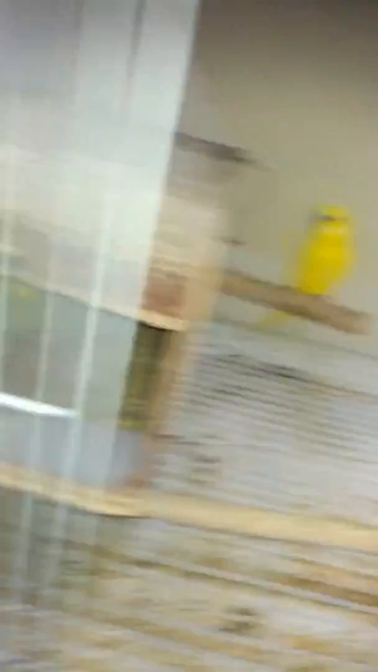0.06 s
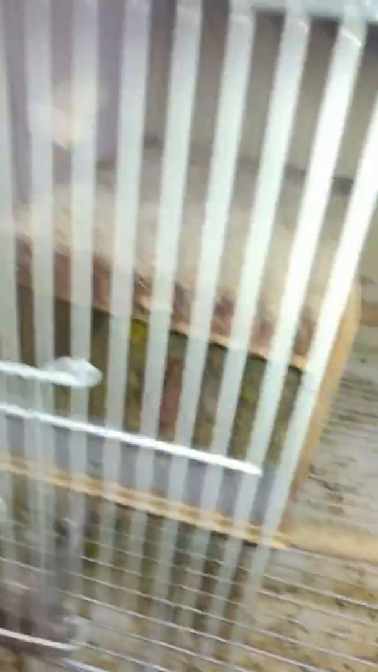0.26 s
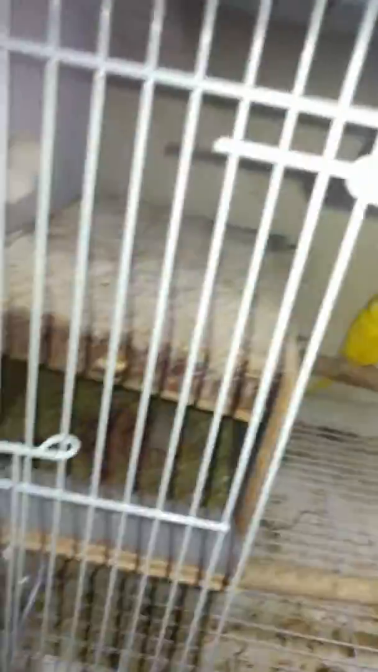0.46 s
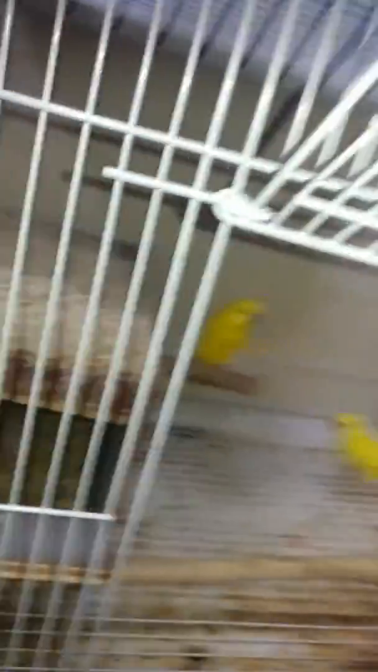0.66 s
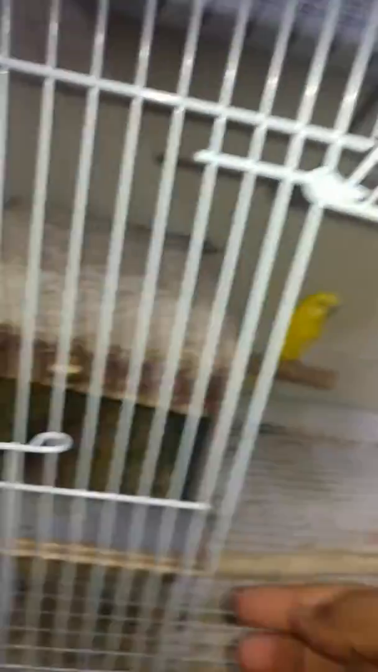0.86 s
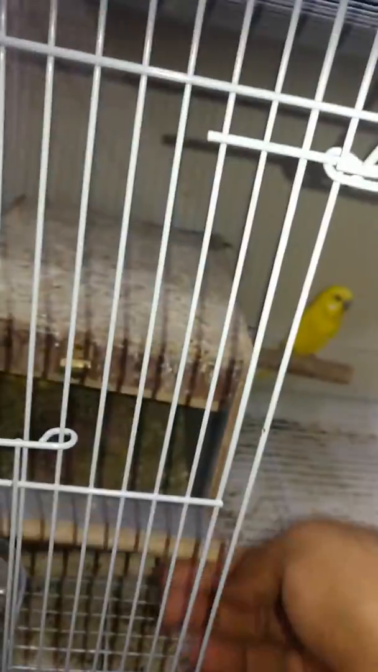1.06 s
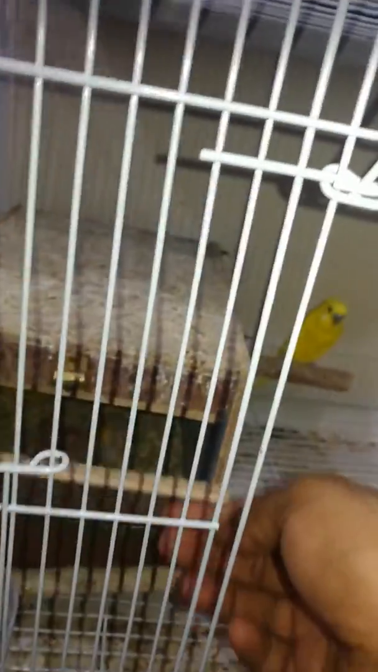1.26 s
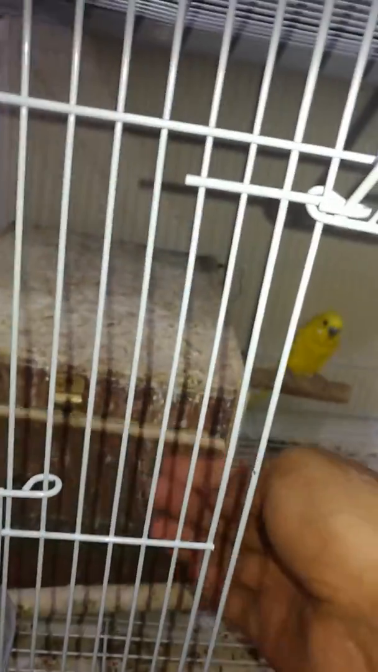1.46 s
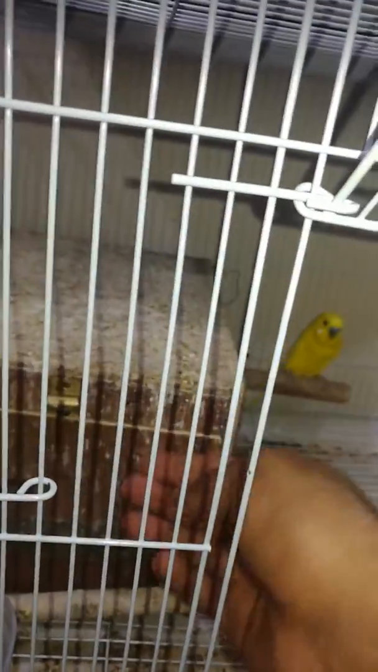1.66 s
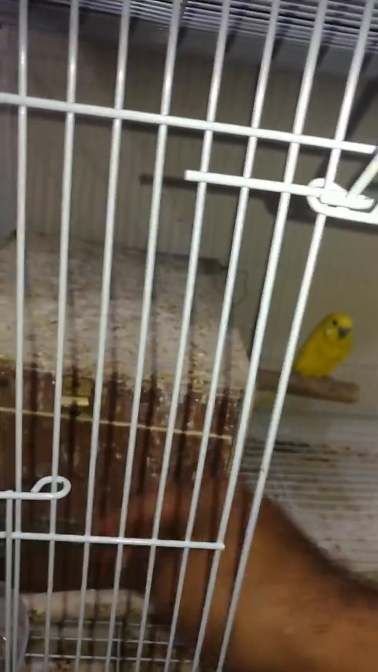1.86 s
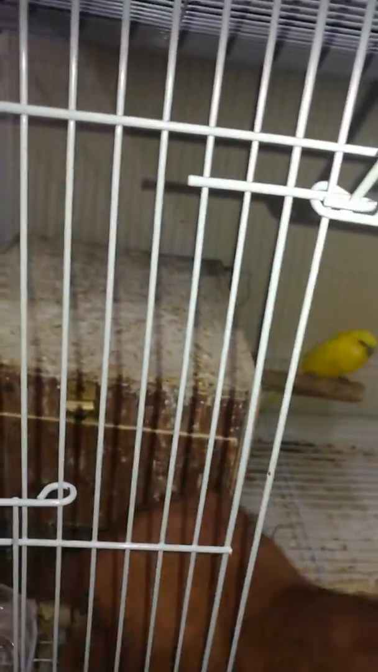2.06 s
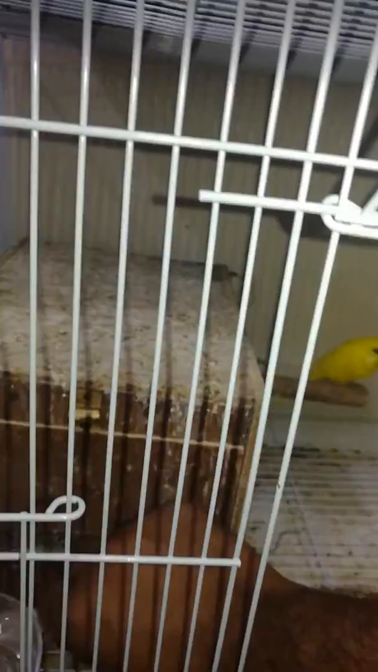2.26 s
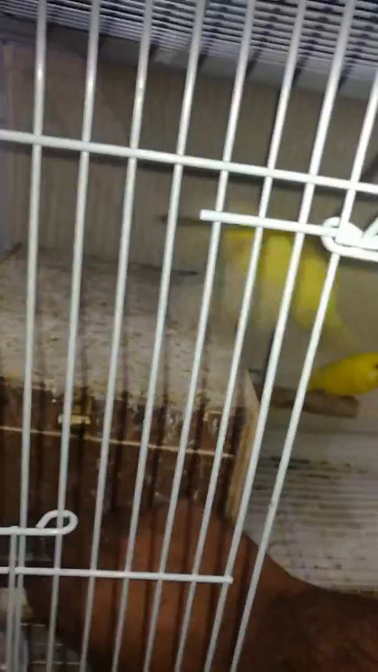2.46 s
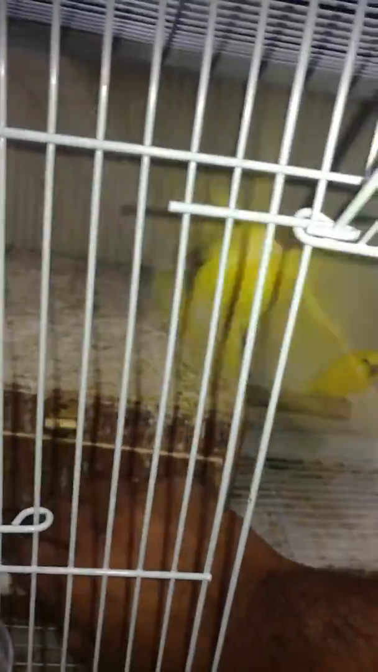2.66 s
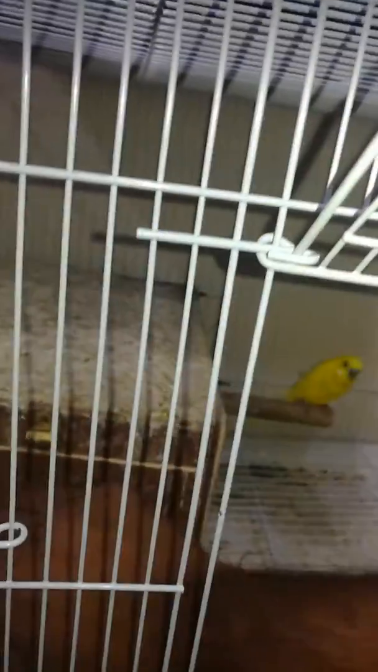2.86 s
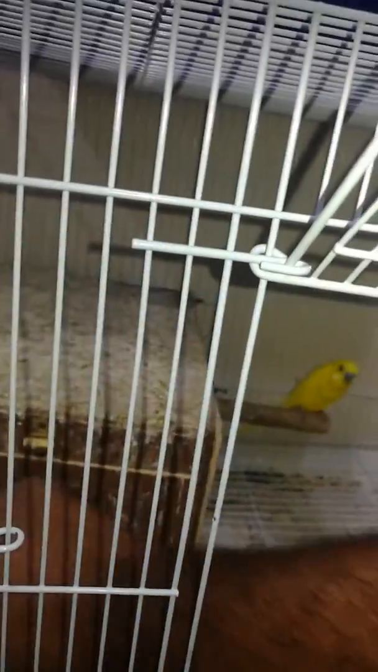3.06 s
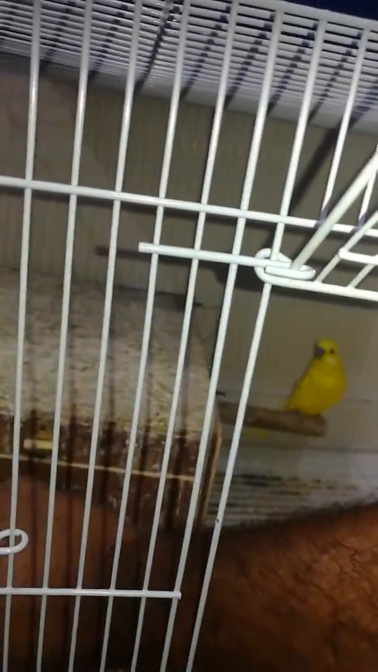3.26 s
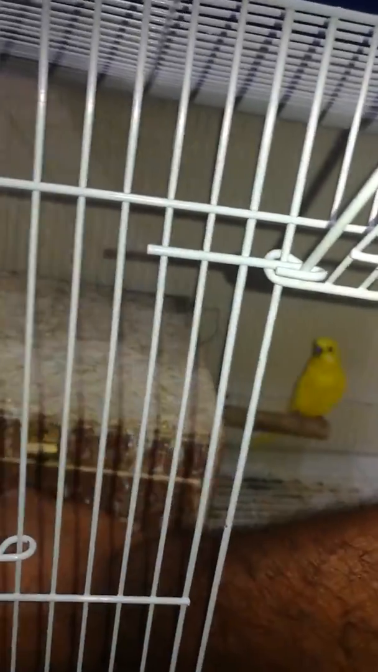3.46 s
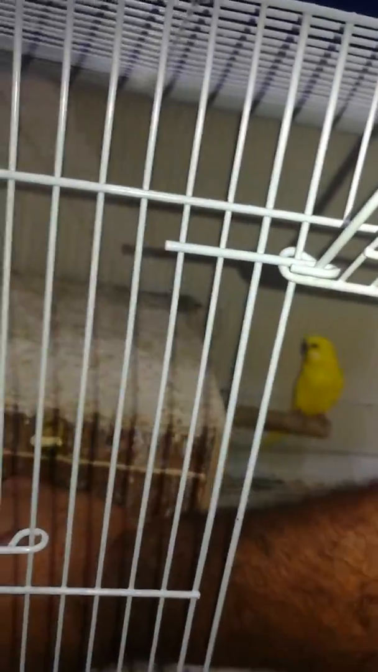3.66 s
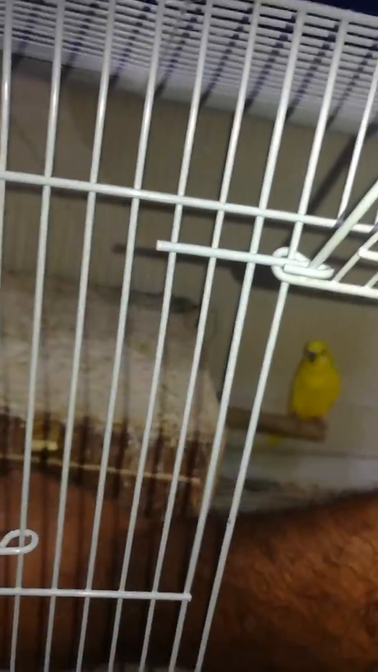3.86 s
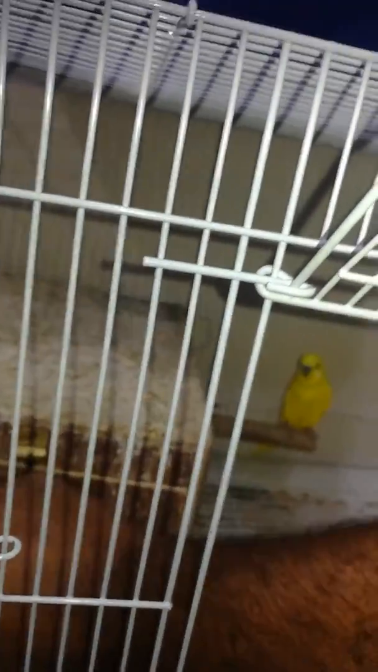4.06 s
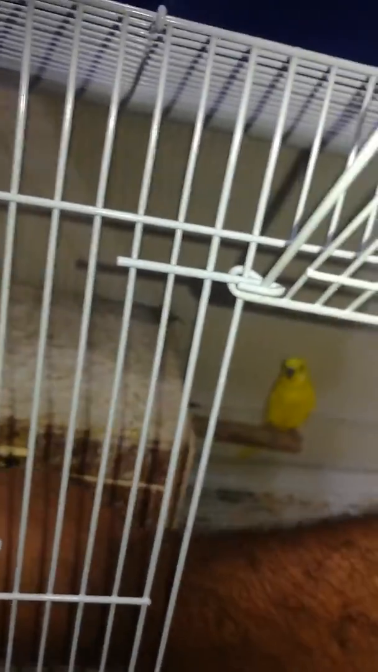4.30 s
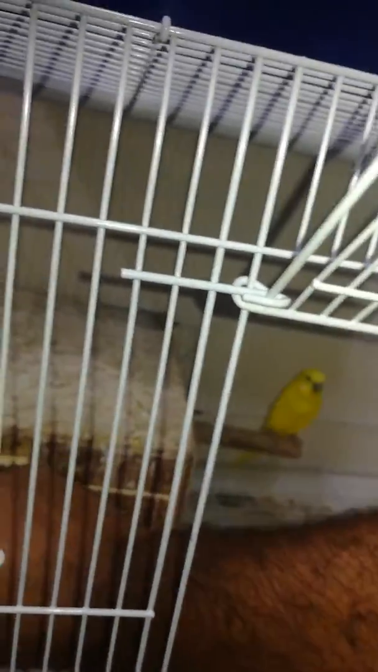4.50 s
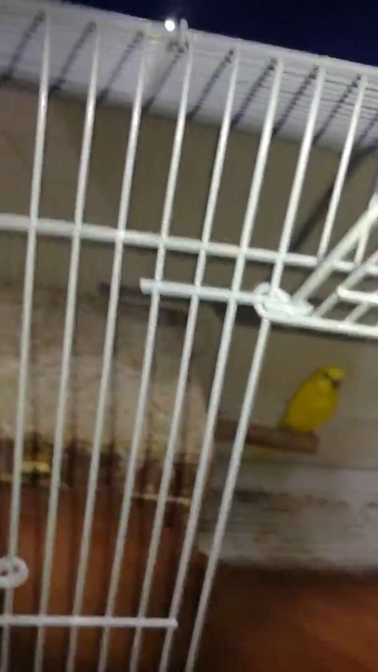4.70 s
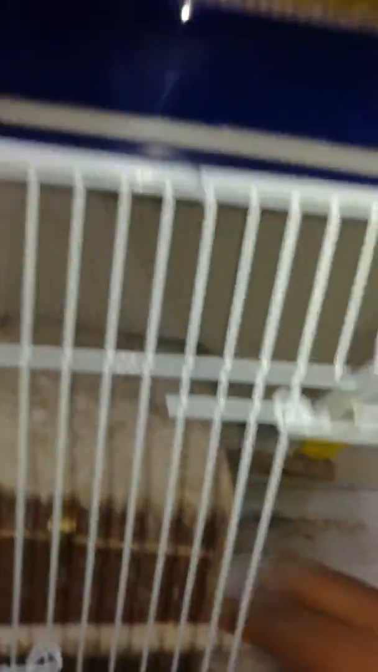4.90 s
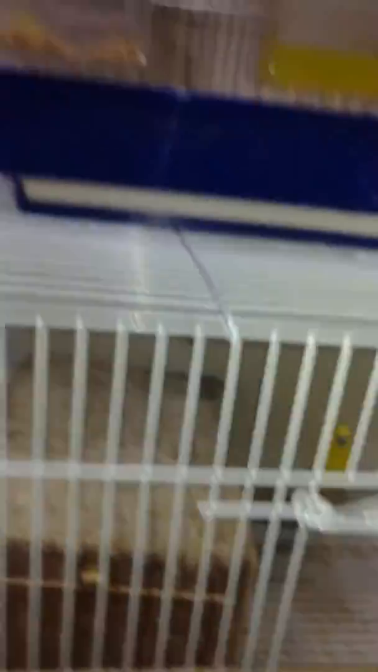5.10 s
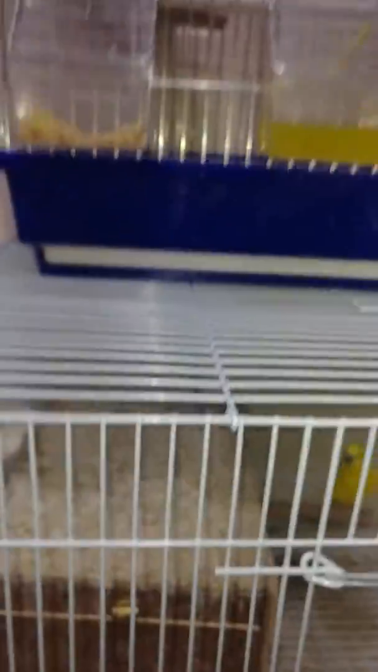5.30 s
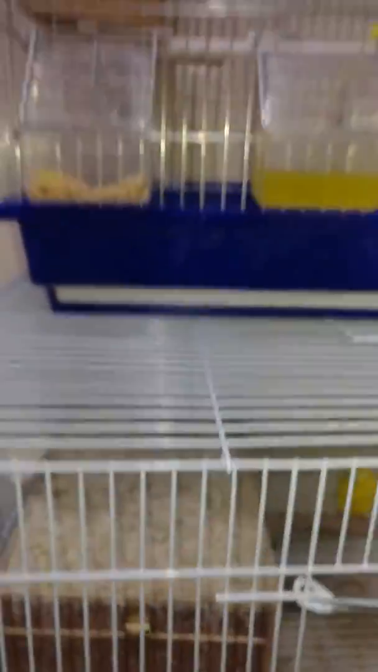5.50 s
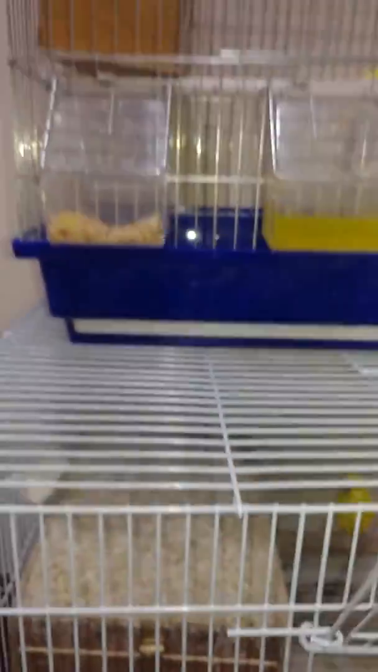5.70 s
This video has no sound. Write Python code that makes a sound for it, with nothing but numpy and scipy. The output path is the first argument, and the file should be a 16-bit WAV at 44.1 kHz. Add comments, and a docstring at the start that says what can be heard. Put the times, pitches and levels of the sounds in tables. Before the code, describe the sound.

Close indoor cage sounds: phone handling, short chirps, wooden bumps, a quick burst of fluttering against wires, then a distant slam.

```python
"""Small birds give short scratchy calls in a wire cage, indoors, close to a hand-held phone. The phone is handled,
a hand bumps and rummages in a wooden nest box, one bird flies up, wings slapping the bars; later something bangs
shut far off. Calls are warbling whistles with overtones; slaps, scrapes and rustles are grainy coloured noise;
bumps, wires and the bang's boom ring decaying modes; puffs are pressure pulses. A hard-walled room, a faint hum
and a noise floor surround them."""
import sys
import numpy as np
from scipy import signal
from scipy.fft import rfft, irfft
from scipy.io import wavfile

SR = 44100
rng = np.random.default_rng(int(sys.argv[2]) if len(sys.argv) > 2 else 0)


def master_out(mix):
    """Clip the mix to full scale and print it as 16-bit PCM to the path in sys.argv[1]."""
    frames = np.transpose(np.atleast_2d(mix))
    ceiling = np.clip(frames, -1, 1)
    pcm = np.round(ceiling * 32767).astype(np.int16)
    wavfile.write(sys.argv[1], SR, pcm)


N = 253134
T = np.arange(N) / SR  # s

# Phone. Each row: frequency in Hz, left minus right port level in dB.
PORT_SHADING = [(200, 0), (600, 1.5), (2200, -6), (4500, -6), (8000, 1), (15000, -2)]
PORT_LAG_SAMPLES, TOP_HZ = 25, 15900  # left port trails right; treble cutoff

# Room reverberation. Each row: frequency in Hz, T60 in seconds.
ROOM_T60 = [(150, 0.82), (500, 0.98), (1500, 0.78), (4000, 0.62), (8000, 0.3), (15000, 0.0059)]

# Noise floor spectrum. Each row: frequency in Hz, relative density in dB.
FLOOR_SPECTRUM = [(25, -13), (200, -17), (320, -14.5), (560, -23), (850, -18.5), (2000, -21.5), (8000, -35),
                  (16000, -38.5)]
FLOOR_DB = -68.5

# Faint low hum. Each row: time in seconds, level in dB.
HUM_LEVEL = [(2.8, -80), (3.55, -74), (3.8, -66), (5.1, -82)]
# Its two tones, in Hz.
HUM_HZ = (298.6, 344.6)

# Spectrum of the far bang's clatter. Each row: frequency in Hz, relative density in dB.
BANG_SPECTRUM = [(120, -65), (200, -36.5), (360, -34.5), (600, -39), (780, -30.5), (2170, -35),
                 (5840, -45.5), (16000, -67.5)]
# Boom and panel modes of the bang. Each row: frequency in Hz, relative level in dB, T60 in seconds.
BOOM_MODES = [(135.6, -8, 0.14), (161, 6, 0.034), (458.5, -19.5, 0.51), (2064, 5, 0.025)]
BANG_S, BANG_T60_S, BANG_TAIL_T60_S = 4.249, 0.4, 1.3
RATTLE_DB, BANG_TAIL_DB, BOOM_DB = -27.0, -39, -19.0

# Bumps: first the phone being handled, then the nest box. Each row: start in seconds, relative level in dB,
# contact time in seconds.
BUMPS = [(0.277, -51.5, 0.0014), (1.434, -44.5, 0.0015), (1.51, -45, 0.00023), (1.514, -26, 0.00082),
         (1.577, -39.5, 0.0017), (1.657, -40.5, 0.0054)]
# Nest box modes, rung by every bump. Each row: frequency in Hz, relative level in dB, T60 in seconds.
BOX_MODES = [(137.7, 2, 0.11), (182, 9.5, 0.045), (439, -9, 0.046), (813, 9, 0.046), (1193, 6, 0.02)]
BOX_LOW_HZ = 152

# Soft finger taps on the phone. Each row: start in seconds, relative level in dB.
TAPS = [(0.288, -54.5), (0.558, -60), (0.655, -57), (5.583, -71.5), (5.612, -67), (5.644, -65),
        (5.678, -63), (5.709, -61.5)]
# Finger dragging on the phone. Each row: time in seconds, relative level in dB.
DRAG_LEVEL = [(0.39, -79), (0.423, -46.5), (0.456, -51.5), (0.481, -43), (0.501, -41.5), (0.52, -70)]
# Drag spectrum. Each row: frequency in Hz, relative density in dB.
DRAG_SPECTRUM = [(330, -12.5), (480, 0.5), (900, 4.5), (1280, 0), (1600, -11.5), (3000, -20.5),
                 (7000, -41.5), (14000, -36.5)]
TAP_GAIN_DB, DRAG_GAIN_DB = 5.5, 10

# Spells of rustling: first the phone being handled, later hand, straw and feathers. Each row: start in seconds,
# length in seconds, relative rustle and air levels in dB.
RUSTLE_SPELLS = [(0, 0.27, -65.5, -62.5), (1.816, 0.22, -67, -49.5), (2.212, 0.17, -61.5, -45.5),
                 (2.562, 0.27, -65, -40.5), (2.929, 0.057, -63.5, -58.5)]
# Rustle spectrum. Each row: frequency in Hz, relative density in dB.
RUSTLE_SPECTRUM = [(150, -63), (250, -1), (651, -7), (816, 2.5), (1140, 0.5), (2440, -5), (2960, -11),
                   (16000, -26.5)]
# Buffeting air spectrum. Each row: frequency in Hz, relative density in dB.
AIR_SPECTRUM = [(12, -14), (20, -11.5), (50, 5), (128, -1), (360, -27), (700, -91)]
RUSTLE_ATTACK_S, RUSTLE_RELEASE_T60_S = 0.0019, 1

# Short scratchy contacts: claws, beaks and wing strokes on the wires. Each row: start in seconds, relative
# level in dB.
SCRATCHES = [(0.102, -53), (1.663, -58), (1.910, -47), (2.054, -56.5), (2.216, -46.5), (2.269, -48.5),
             (2.526, -49), (2.576, -43), (2.594, -40.5), (2.937, -49), (2.991, -51.5), (3.042, -35.5),
             (3.189, -53.5), (4.603, -47)]
# Cage wire modes. Each row: frequency in Hz, relative level in dB, T60 in seconds.
WIRE_MODES = [(302, -9, 1.6), (802, -3, .9), (838, -1, .95), (880, -3, .9)]
# Feather and scratch spectrum. Each row: frequency in Hz, relative density in dB.
FEATHER_SPECTRUM = [(150, -3), (250, 3), (480, -7), (800, 7), (1350, 0), (1820, -1.5), (16000, -22)]
SCRATCH_T60_S, SCRATCH_GRAIN_DB = 0.05, 5

# Wing strokes and lighter flicks. Each row: centre in seconds, relative slap level in dB, relative air push
# level in dB, brightness in dB per octave.
WINGBEATS = [(2.627, -51, -28, 2), (2.680, -35.5, -21.5, 1.5), (2.723, -32, -33.5, -2.5),
             (2.728, -30.5, -30, 3.5), (2.764, -40.5, -37, -0.5), (2.780, -29, -35.5, -0.2),
             (2.797, -58, -27, 1), (2.818, -44.5, -30.5, 8), (2.829, -33.5, -38, 0.6)]
SLAP_S, SWISH_S, SWISH_DB = 0.0011, 0.007, -16.5  # decay constants; swish relative to slap
WING_WIDTH_DB = 1.5
# Raking: time of the nearest pass, half-width, drop at that half-width.
PASS_S, PASS_WIDTH_S, PASS_DROP_DB = 2.762, 0.07, 2.4
RAKE_DB, RAKE_TILT_DB_PER_OCTAVE = -51, 1.2

# Far calls. Each row: start in seconds, length in seconds, start and end pitch in Hz, relative level in dB,
# first overtone in dB, roughness from 0 to 1.
FAR_CALLS = [(3.84, 0.19, 1433, 1346, -62.5, -13, 0.54), (5.418, 0.017, 1225, 1164, -49.5, -25, 0.2),
             (5.58, 0.13, 1770, 1240, -66.5, -40, 0.7)]
# Near birds' syllables. Each row: start in seconds, length in seconds, start and end pitch in Hz, relative
# level in dB, first overtone in dB, roughness from 0 to 1.
SYLLABLES = [ (.178, 0.026, 2593, 2180, -46.5, -4, 0.98), (.214, 0.022, 3332, 3160, -40.5, -7, 0.06),
             (.238, 0.021, 2296, 2203, -37, -10, 0.32), (.745, .015, 3370, 3230, -55.5, -29, 0.05),
             (.762, 0.012, 2450, 2530, -47, -25, 0.2), (.776, 0.016, 3080, 2850, -50, -28, 0.38),
             (.792, 0.044, 2334, 3260, -48, -13, 0.32), (.834, 0.016, 2380, 1990, -39, -8, 0.35),
             (1.209, 0.059, 2433, 2566, -43.5, -21.5, 0.41), (1.249, 0.029, 2552, 3016, -38.5, -24.5, 0.42),
             (1.279, 0.017, 2345, 2094, -37.5, -16, 0.18), (1.979, 0.017, 2475, 2425, -47, -16, 0.26),
             (2.353, 0.031, 2720, 2373, -41, -34, 0.23), (2.408, 0.018, 3330, 2100, -41.5, -20, 0.3),
             (2.43, 0.024, 2110, 1560, -35, -50, 0.36), (2.514, 0.009, 2590, 2110, -41, -16, 0.42),
             (3.192, 0.052, 2425, 3220, -49, -7, 0.62), (3.243, 0.0142, 2710, 2105, -45.5, -18, 0.31),
             (3.607, 0.057, 2660, 2835, -46.5, -12, 0.39), (3.66, 0.038, 2620, 2600, -38.5, -22, 0.34),
             (3.692, 0.0284, 2717, 2260, -36.5, -23, 0.35), (3.73, 0.026, 2335, 2142, -32, -10, 0.2),
             (3.685, 0.088, 1406, 1615, -44.5, -1, 0.59)]
WARBLE_SHARE, WARBLE_HZ = 0.12, 360  # pitch scatter at full roughness, how often it turns
RASP_RAD, RASP_HZ = 0.6, 700  # phase slip at full roughness, how often it turns
OVERTONE_FALL_DB, BEAK_TOP_HZ = 10, 6670  # drop per overtone; the beak radiates little above its top
CALL_NEAR_DB, CALL_NEAR_T60_S, CALL_ROOM_DB = -4, 0.28, -19.5
CAGE_PAN_DB = -4.5  # left minus right


def undb(db):
    """Amplitude from dB."""
    return 10 ** (np.asarray(db) / 20)


def unit(x):
    """Scales to an RMS of 1."""
    return x / np.sqrt(np.mean(x ** 2) + 1e-20)


def fade(t, t60):
    """Exponential decay, 60 dB in t60 seconds."""
    return np.exp(-np.log(1000) * t / t60)


def add(track, s, x):
    """Mixes x into the track at time s."""
    i = max(int(s * SR), 0)
    track[i:i + len(x)] += x[:N - i]


def colour(x, points, tilt_db_per_octave=0):
    """Filters by a (Hz, dB) spectrum at unit power gain, tilted, with a skirt below the first point."""
    hz, db = np.transpose(points)
    f = np.maximum(np.fft.rfftfreq(x.shape[-1], 1 / SR), 1)
    skirt = np.minimum(f / hz[0], 1) ** 2
    shape_db = np.interp(np.log(f), np.log(hz), db) + tilt_db_per_octave * np.log2(f)
    gain = skirt * undb(shape_db)
    return irfft(rfft(x) * unit(gain), x.shape[-1])


def wobble(size, rate_hz):
    """Random line of spread near 1 through rate_hz knots a second."""
    knots = rng.standard_normal(8192)
    return np.interp(np.arange(size) / SR * rate_hz, np.arange(len(knots)), knots)


def crackle(size, grain_db, rate_hz):
    """Noise broken into grains of uneven strength."""
    return unit(rng.standard_normal(size) * undb(grain_db * wobble(size, rate_hz)))


def ring(modes):
    """Impulse response of a set of decaying modes."""
    t = T[:SR]
    return sum(undb(db) * fade(t, t60) * np.sin(2 * np.pi * hz * t) for hz, db, t60 in modes)


def convolve(x, response):
    """Filters by an impulse response, cut to N samples."""
    return signal.fftconvolve(np.atleast_2d(x), np.atleast_2d(response), axes=1)[:, :N]


def ports(x, pan_db=0):
    """Sound reaches the right port first; pan_db is left minus right."""
    x = np.ravel(x)
    left = np.roll(x, PORT_LAG_SAMPLES // 2) * undb(pan_db / 2)
    right = np.roll(x, -PORT_LAG_SAMPLES // 2) * undb(-pan_db / 2)
    return np.array([left, right])


def diffuse(size):
    """Noise from all around: alike at both ports in the bass, unrelated in the treble."""
    mid, side = rfft(rng.standard_normal((2, size)))
    alike = np.sinc(2 * np.fft.rfftfreq(size, 1 / SR) * PORT_LAG_SAMPLES / SR)
    signs = np.array([[1], [-1]])
    return irfft(mid * np.sqrt(1 + alike) + signs * side * np.sqrt(1 - alike), size) / np.sqrt(2)


def room():
    """Stereo room tail, dying sooner in the treble."""
    f, t, cells = signal.stft(diffuse(SR), SR, nperseg=256)
    hz, t60 = np.transpose(ROOM_T60)
    cell_t60 = np.interp(np.log(f + 1), np.log(hz), t60)[:, None]
    tail = signal.istft(cells * fade(t, cell_t60), SR)[1]
    return unit(tail) / np.sqrt(tail.shape[1])


def place(x, near_db, near_t60, room_db, pan_db=0):
    """Direct sound, quick reflections from cage and wall, then the room."""
    t = T[:SR // 2]
    near = unit(diffuse(len(t)) * fade(t, near_t60) * (t > .001)) / np.sqrt(len(t))
    return ports(x, pan_db) + undb(near_db) * convolve(x, near) + undb(room_db) * convolve(x, room())


def noise_floor():
    """Diffuse coloured noise whose level wavers slowly."""
    return colour(diffuse(N), FLOOR_SPECTRUM) * undb(FLOOR_DB + wobble(N, 4.3))


def hum():
    """Two close low tones that waver and beat."""
    tones = sum(wobble(N, 22) * np.sin(2 * np.pi * hz * T) for hz in HUM_HZ)
    return ports(unit(tones) * undb(np.interp(T, *np.transpose(HUM_LEVEL))))


def bang():
    """A far slam: a short boom and a dense clatter that the room draws out."""
    t = np.maximum(T - BANG_S, 0)
    rattle = colour(diffuse(N), BANG_SPECTRUM, 1) * undb(0.44 * wobble(N, 300)) * fade(t, BANG_T60_S)
    tail = colour(diffuse(N), BANG_SPECTRUM) * fade(t, BANG_TAIL_T60_S)
    boom = np.zeros(N)
    add(boom, BANG_S, undb(BOOM_DB) * ring(BOOM_MODES) * (1 - fade(T[:SR], 0.067)))
    onset = 1 - np.exp(-t / 0.011)
    clatter = onset * (undb(RATTLE_DB) * rattle + undb(BANG_TAIL_DB) * tail)
    return clatter + place(boom, -38, 0.57, -11)


def perch():
    """One dry wooden click: two short modes with a softened onset."""
    out = np.zeros(N)
    modes = [(1230, 0.44, 0.0091), (1540, 0.5, 0.0049)]  # Hz, dB, T60 s
    add(out, 1.191, undb(-23.5) * ring(modes) * (1 - fade(T[:SR], 0.0078)))
    return out


def bumps():
    """A softer contact pushes longer and favours the low modes; the small box radiates little deep bass."""
    pushes = np.zeros(N)
    for s, db, contact_s in BUMPS:
        push = np.exp(-((T[:1024] - contact_s) / (contact_s / 3)) ** 2)
        add(pushes, s, undb(db) * push / push.sum())
    highpass = signal.butter(4, BOX_LOW_HZ, "high", fs=SR, output="sos")
    return signal.sosfilt(highpass, convolve(pushes, ring(BOX_MODES)))


def grip():
    """A finger sticks and slips on the phone case, and taps it softly."""
    s, db = np.transpose(DRAG_LEVEL)
    slips, taps = np.zeros(N), np.zeros(N)
    for slip_s in s[0] + np.cumsum(rng.uniform(0.0016, 0.0059, 40)):
        add(slips, slip_s, undb(12.0 + 2 * rng.standard_normal(1)))
    drag = colour(slips + .5 * rng.standard_normal(N), DRAG_SPECTRUM)
    drag *= undb(DRAG_GAIN_DB + np.interp(T, s, db, -120, -120))
    t = T[:2048]
    for tap_s, tap_db in TAPS:
        thud = t / 0.0022 * np.exp(-t / 0.0041) * np.sin(2 * np.pi * rng.normal(446, 37) * t)
        add(taps, tap_s, undb(TAP_GAIN_DB + tap_db) * thud)
    return ports(drag + taps, 17.3)


def spell(s, length_s):
    """Envelope of one movement: quick attack, hold, release."""
    attack = np.clip((T - s) / RUSTLE_ATTACK_S, 0, 1)
    return attack * fade(np.maximum(T - s - length_s, 0), RUSTLE_RELEASE_T60_S)


def rustling():
    """Handling, then hand, straw and feathers: grainy rustle in uneven fits, and air buffeting the microphone."""
    _, _, rustle_db, air_db = np.transpose(RUSTLE_SPELLS)
    spells = np.array([spell(s, length_s) for s, length_s, _, _ in RUSTLE_SPELLS])
    fits_db = 2.5 * wobble(N, 45)
    rustle = colour(crackle(N, 1.7, 600), RUSTLE_SPECTRUM) * (undb(rustle_db) @ spells) * undb(fits_db)
    gusts = colour(crackle(N, 2.4, 60), AIR_SPECTRUM) * (undb(air_db) @ spells)
    return rustle, gusts


def scratches():
    """Claws, beaks and wing strokes touch the wires: short decaying grainy noise."""
    out, t = np.zeros(N), T[:4096]
    for s, db in SCRATCHES:
        envelope = (1 - np.exp(-t / 0.000043)) * fade(t, SCRATCH_T60_S)
        scratch = envelope * crackle(len(t), SCRATCH_GRAIN_DB, 1643)
        add(out, s, undb(db) * colour(scratch, FEATHER_SPECTRUM, 0.28))
    return out


def raking():
    """Feather tips rake the bars in ragged scrapes, dull and bright, loudest as the bird passes the phone."""
    dull = unit(crackle(N, 4, 1500) * undb(6 * wobble(N, 130)))
    bright = unit(crackle(N, 5, 1500) * undb(6 * wobble(N, 200)))
    scrapes = colour(dull, RUSTLE_SPECTRUM, -RAKE_TILT_DB_PER_OCTAVE)
    scrapes += colour(bright, RUSTLE_SPECTRUM, RAKE_TILT_DB_PER_OCTAVE)
    drop_db = PASS_DROP_DB * ((T - PASS_S) / PASS_WIDTH_S) ** 2
    return scrapes * undb(RAKE_DB - drop_db)


def wings():
    """Each stroke swishes up to a crackling slap and shoves a puff of air at the phone."""
    feathers, puffs = np.zeros(N), np.zeros(N)
    t = np.arange(-2048, 2048) / SR
    for s, slap_db, push_db, tilt_db_per_octave in WINGBEATS:
        slap = np.exp(-np.abs(t) / SLAP_S) * crackle(len(t), 4.0, 1458.5)
        # feathers rasp over each other as they hit
        swish = undb(SWISH_DB) * np.exp(-np.abs(t) / SWISH_S) * crackle(len(t), 6, 400)
        stroke = colour(slap + swish, FEATHER_SPECTRUM, 0.5 + tilt_db_per_octave)
        add(feathers, s + t[0], undb(slap_db) * stroke)
        u = t / 0.0012
        puff = 2 * u / (1 + u ** 2) * np.hanning(len(t))  # negative, then positive
        add(puffs, s + t[0], undb(push_db) * puff)
    return feathers, puffs


def calls(table):
    """Warbling whistles with overtones; in rough ones the syrinx's second side beats with the first."""
    out = np.zeros(N)
    for s, length_s, start_hz, end_hz, db, overtone_db, rough in table:
        u = np.linspace(0, 1, int(length_s * SR))
        size = len(u)
        glide_hz = start_hz + (end_hz - start_hz) * u
        hz = glide_hz * (1 + WARBLE_SHARE * rough * wobble(size, WARBLE_HZ))
        phase = 2 * np.pi * np.cumsum(hz) / SR + RASP_RAD * rough * wobble(size, RASP_HZ)
        overtones = sum(undb(overtone_db - OVERTONE_FALL_DB * k) * np.sin((k + 2) * phase) for k in range(3))
        flutter = 1 + wobble(size, 900)  # overtones only
        beat = 1 + rough ** 2 * np.cos(0.34 * phase + 2 * wobble(size, 413.4))
        swell = signal.windows.tukey(size, .4) * undb(10 * rough * wobble(size, 300))
        voice = np.sin(phase) + flutter * overtones
        add(out, s, undb(db) * unit(swell * beat * voice))
    return signal.sosfilt(signal.butter(4, BEAK_TOP_HZ, fs=SR, output="sos"), out)


def scene():
    """Cage sounds, bumps and click get room reverberation; puffs, gusts and fingers reach the phone directly."""
    feathers, puffs = wings()
    rustle, gusts = rustling()
    contacts = feathers + raking() + scratches() + rustle
    wires = convolve(contacts, ring(WIRE_MODES))[0] * undb(-59)
    cage = undb(8.0) * place(contacts + wires, 0.89, 0.0099, -10.0, CAGE_PAN_DB) + ports(puffs + gusts)
    # a spread wing is wide: fresh feather noise, opposite in sign at the two ports
    cage += undb(WING_WIDTH_DB) * ports(wings()[0], -2) * np.array([[1], [-1]])
    birds = place(calls(SYLLABLES), CALL_NEAR_DB, CALL_NEAR_T60_S, CALL_ROOM_DB, CAGE_PAN_DB)
    far = calls(FAR_CALLS)
    birds += undb(-2.5) * ports(far) + convolve(far, room())
    knocks = place(bumps() + perch(), -1.7, 0.11, -27.0)
    return noise_floor() + hum() + bang() + knocks + grip() + cage + birds


def record(dry):
    """The phone's body colours each port differently; the top of the treble is cut."""
    hz, db = np.transpose(PORT_SHADING)
    shade_db = np.interp(np.log(np.fft.rfftfreq(N, 1 / SR) + 1), np.log(hz), db)
    heard = irfft(rfft(dry) * undb(np.array([shade_db, -shade_db]) / 2), N)
    return signal.sosfilt(signal.ellip(10, .2, 80, TOP_HZ, fs=SR, output="sos"), heard)


dry = scene()
out = record(dry)
master_out(out)
```